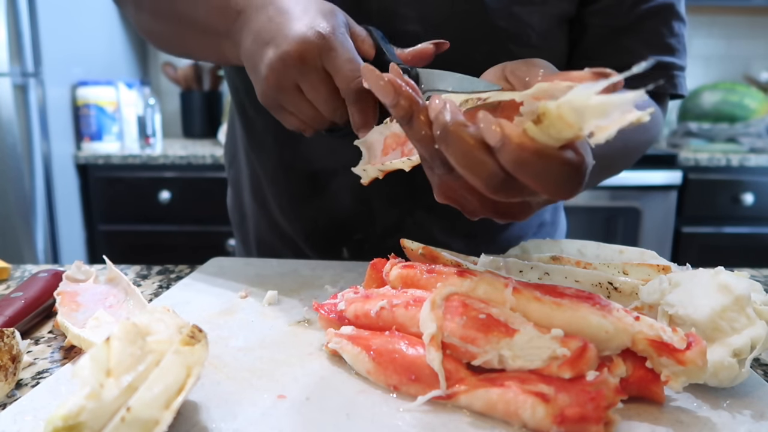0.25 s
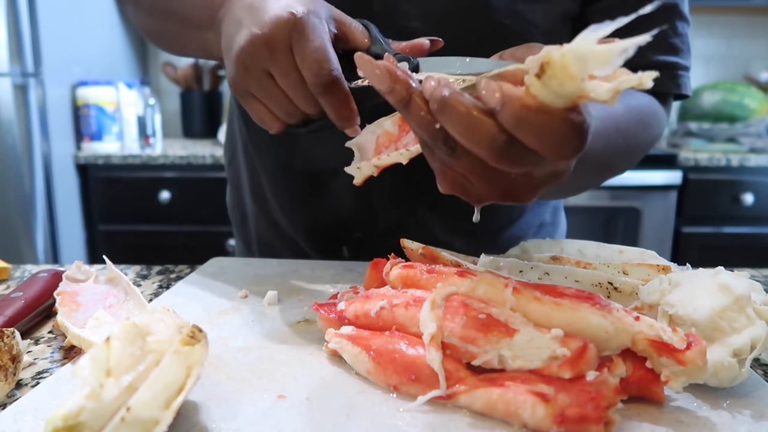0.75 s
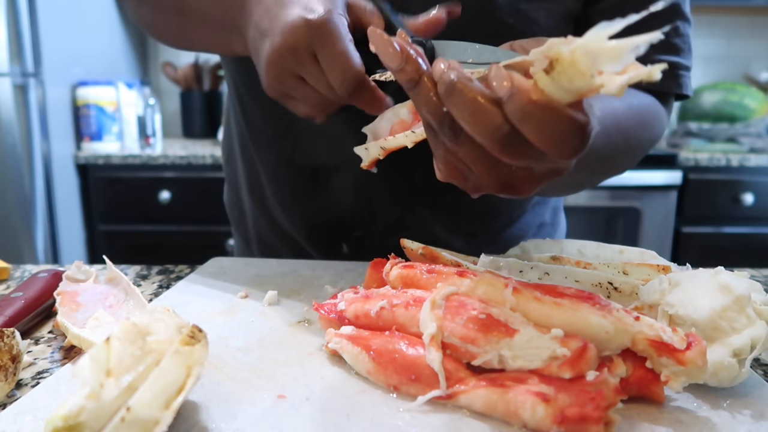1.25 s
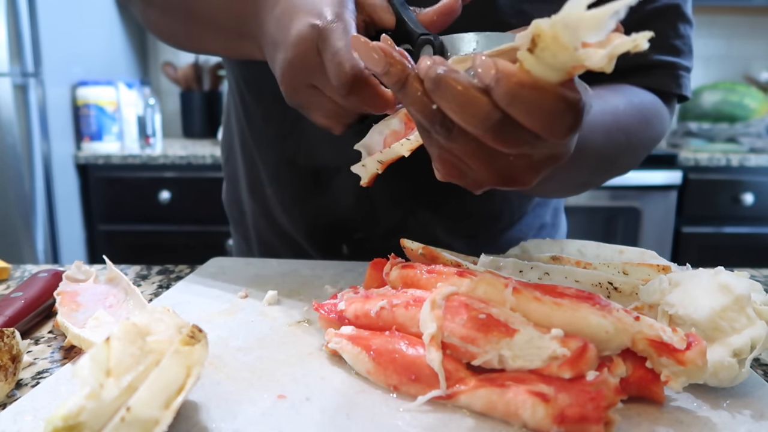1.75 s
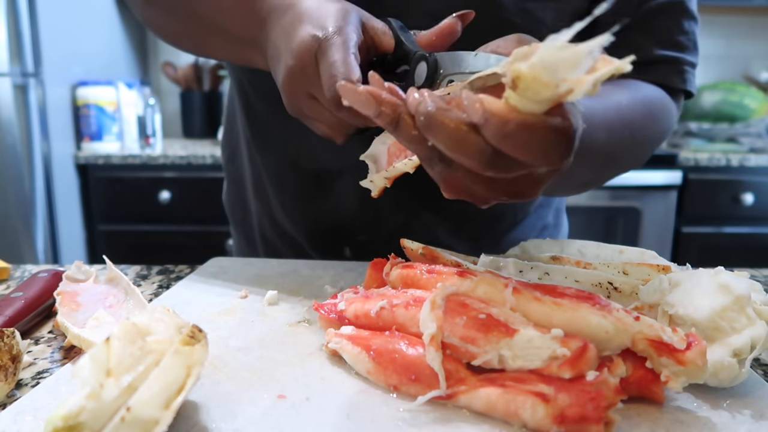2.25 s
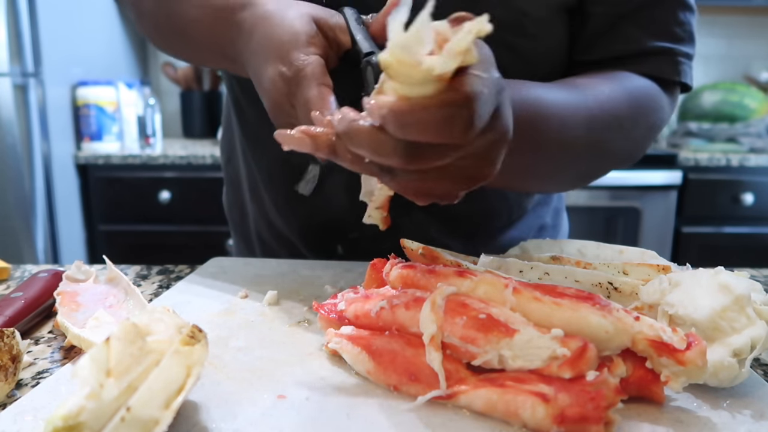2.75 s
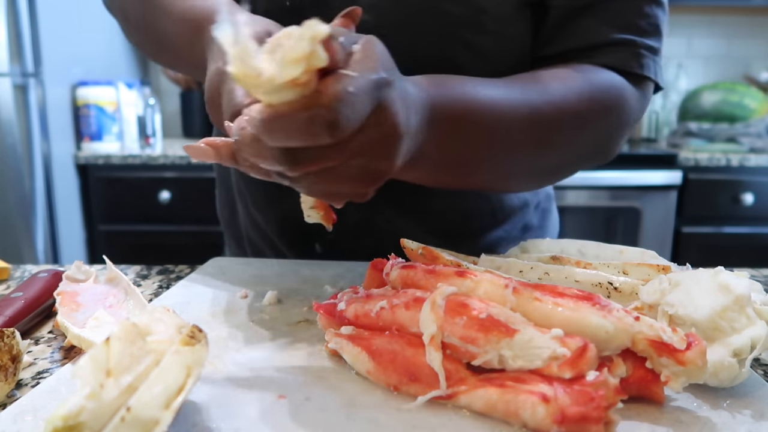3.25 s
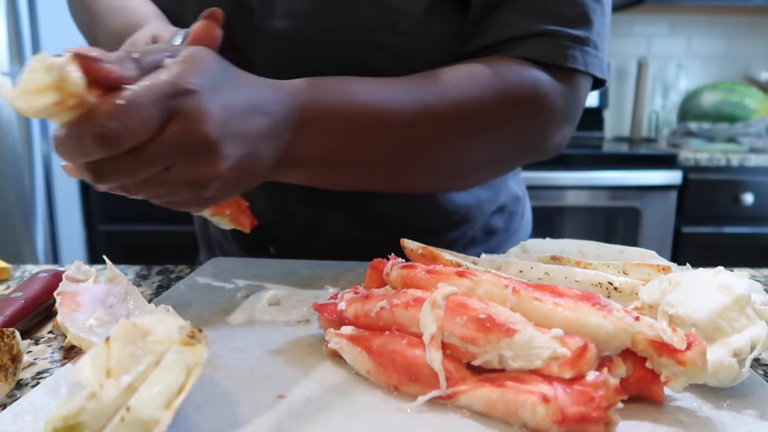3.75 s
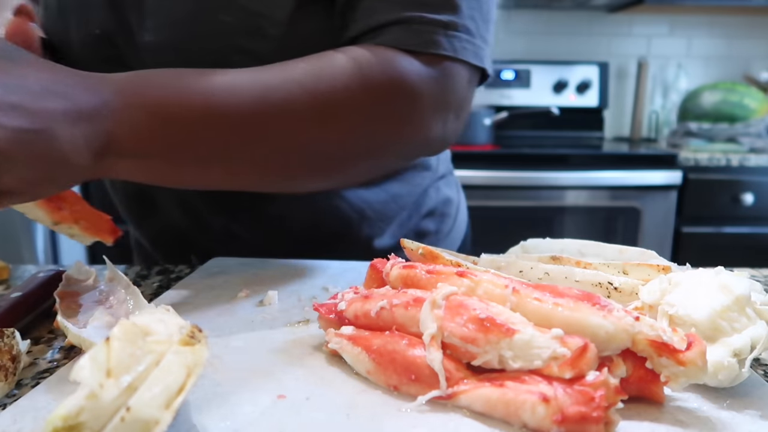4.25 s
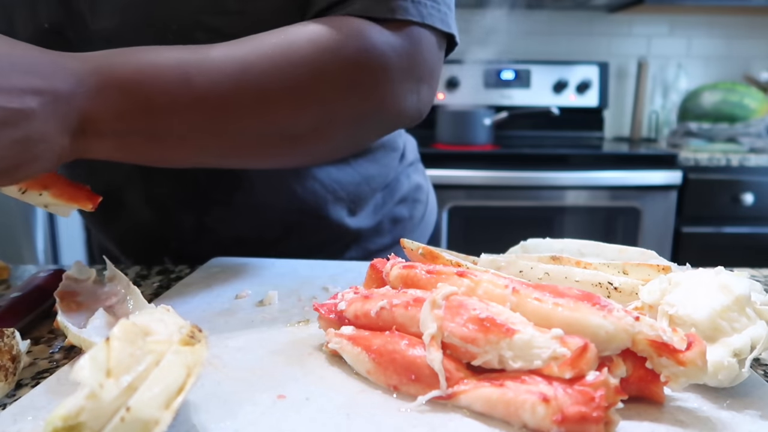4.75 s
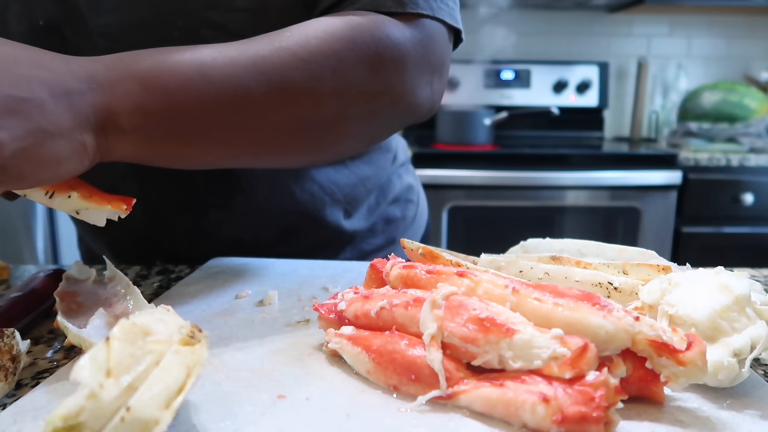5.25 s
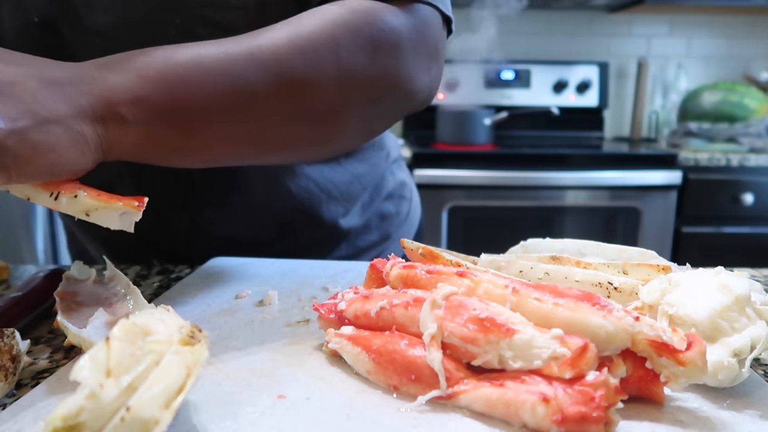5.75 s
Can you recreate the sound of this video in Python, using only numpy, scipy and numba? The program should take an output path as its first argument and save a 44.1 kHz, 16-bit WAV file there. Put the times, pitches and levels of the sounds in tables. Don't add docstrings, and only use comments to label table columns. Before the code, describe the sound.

Close crisp shell snips and crunches in a small kitchen, thinning to faint ticks, ending in a quick ratcheting creak and a crack.

```python
import sys
import numpy as np
from scipy import signal
from scipy.fft import rfft, irfft, next_fast_len
from scipy.io import wavfile
from scipy.ndimage import uniform_filter1d
from numba import njit

SR = 44100
rng = np.random.default_rng(int(sys.argv[2]) if len(sys.argv) > 2 else 0)


def volts(x):
    e = np.asarray(x, float) / 20
    return 10 ** e


def to_wav(s):
    ch = np.atleast_2d(s).T
    pcm = np.round(np.clip(ch, -1, 1) * 32767)
    wavfile.write(sys.argv[1], SR, pcm.astype(np.int16))


N = 264712
SHORT, LONG, TAIL = 2048, 16384, 1500
SEAM_HZ = 5190
LOOSE_DB, FAR_DB = -20, -11


def ring(x, hz, width_hz):
    return signal.lfilter(*signal.iirpeak(hz, hz / width_hz, fs=SR), x)


def chord(x, modes):
    out = 0
    for hz, width_hz, db in modes:
        twice = ring(ring(x, hz, width_hz), hz, width_hz)
        out = out + volts(db) * np.sqrt(300 / width_hz) * twice
    return out


def swell(modes):
    ms = np.arange(SHORT) / SR * 1000
    out = 0
    for hz, rise_ms, db in modes:
        envelope = (ms / rise_ms) ** 2 * np.exp(-ms / rise_ms)
        out = out + volts(db) * envelope * np.sin(2 * np.pi * hz * ms / 1000)
    return out


def colour(x, points, turn=1):
    hz, db = np.transpose(points)
    size = next_fast_len(len(x))
    f_hz = np.maximum(np.arange(size // 2 + 1) * SR / size, 1)
    gain = volts(np.interp(np.log(f_hz), np.log(hz), db))
    return irfft(rfft(x, size) * turn * gain, size)[:len(x)]


def level(x, db):
    return x * volts(db) / np.sqrt(np.mean(x ** 2) + 1e-18)


def walk(rate_hz):
    hold = int(SR / rate_hz)
    steps = np.repeat(rng.standard_normal(N // hold + 1), hold)
    return uniform_filter1d(uniform_filter1d(steps, hold), hold)[:N]


def fractures(size, spread_db):
    return rng.standard_normal(size) * volts(spread_db * rng.exponential(size=size))


def background():
    # f/Hz, density/dB
    fan_tone = [(15, -56), (25, -40), (48, -28), (58, -22), (84, -4.5), (108, -2), (136, -5), (188, -5.5),
                (220, -13.5), (304, -20), (393, -18.5), (443, -27), (487, -22), (549, -31), (620, -34.5),
                (810, -73), (1360, -120)]
    # f/Hz, density/dB
    pot_tone = [(350, 0.5), (600, -12), (756, 2), (1010, -4), (1090, -5), (1490, -4), (1960, -8),
                (2130, -8), (2280, -9.5), (2570, -10.5), (7140, -23), (11300, -25), (15500, -39)]
    fan_waver = volts(walk(1.74))
    pot_waver = volts(0.54 * walk(3.74) + 2.25 * walk(26.85))
    channels = []
    for _ in range(2):
        hum = level(colour(rng.standard_normal(N), fan_tone), -41.5)
        simmer = level(colour(fractures(size=N, spread_db=1.5), pot_tone), -52.5)
        channels.append(fan_waver * hum + pot_waver * simmer)
    return channels


def shell(burst, hz, upper_hz, treble_db, energy, tube_db):
    # f/Hz, width/Hz, level/dB
    shell_modes = [(1090, 720, -9), (1450, 380, -7), (2800, 540, -3), (3406, 460, -6)]
    body = chord(burst, [(hz, 900, 2.5), (hz, 260, tube_db)] + shell_modes)
    crack = chord(burst, [(upper_hz, 1300, -4), (6300, 6500, 4), (10200, 1500, -9), (14000, 4500, -4)])
    sound = body / body.std() + volts(treble_db) * crack / crack.std()
    return sound * np.sqrt(energy / np.sum(sound ** 2))


def scrapes():
    # start/s, end/s, level/dB, ring f/Hz, treble against ring/dB
    drags = [(0.119, 0.134, -33.5, 2640, -14), (.178, 0.2, -23, 2150, -9), (0.443, 0.51, -44, 2160, -8),
             (1.316, 1.367, -52, 2040, -3), (1.534, 1.639, -37.5, 2240, -5.5), (1.95, 1.99, -40, 2150, 13),
             (2.684, 2.778, -47, 2300, -4.5), (3.071, 3.095, -31, 3000, -4),
             (3.311, 3.384, -43.5, 2160, -2.5), (3.637, 3.685, -47, 2560, 5),
             (4.052, 4.095, -47, 2800, -21), (5.058, 5.167, -49, 1470, -27),
             (5.187, 5.229, -44.5, 2800, -7), (5.486, 5.553, -47.5, 3680, -0.5),
             (5.763, 5.845, -30.5, 2880, -6.5), (5.826, 5.839, -27.5, 3000, -2)]
    out = np.zeros(N + SHORT)
    catch = volts(3.8 * walk(90))
    for start_s, end_s, db, hz, treble_db in drags:
        a, size = int(start_s * SR), int((end_s - start_s) * SR)
        burst = fractures(size=LONG, spread_db=1.3)[:size]
        burst = burst * np.hanning(size) ** 0.32 * catch[a:a + size]
        padded = np.pad(burst, (0, TAIL))
        out[a:a + size + TAIL] += volts(db - 4.5) * shell(padded, hz, SEAM_HZ, treble_db, 0.54 * size, FAR_DB)
    return out[:N]


def snaps(rows, upper_hz, tube_db):
    near, walls = np.zeros(N + 2 * SHORT), np.zeros(N + 2 * SHORT)
    t = np.arange(SHORT) / SR
    click = (t == 0).astype(float)
    for middle_s, db, ms, hz, treble_db in rows:
        x = t / (0.32 * ms / 1000)
        burst = fractures(size=SHORT, spread_db=2.5) * x ** 2 * np.exp(-x ** 1.018)
        energy = volts(db + 1.63) ** 2 * ms * SR / 1000
        start = max(int((middle_s - 0.74 * ms / 1000) * SR), 0)
        middle = int(middle_s * SR)
        near[start:start + SHORT] += shell(burst, hz, upper_hz, treble_db, energy, tube_db)
        walls[middle:middle + SHORT] += shell(click, hz, upper_hz, treble_db, energy, tube_db + FAR_DB / 2)
    return np.array([near[:N], walls[:N]])


def cuts():
    # middle/s, level/dB, length/ms, ring f/Hz, treble against ring/dB
    bites = [(.1283, -30.5, 2.9, 2400, -9), (.1516, -37, 2.6, 2260, -9), (.1563, -38.5, 2.5, 2490, -2),
             (.1929, -24, 6.9, 2720, -1.5), (.2463, -49, 4.8, 2430, -9), (.2544, -27, 3.4, 2260, -4.5),
             (.427, -33, 3.3, 1970, -31), (.4341, -45, 8.6, 1980, -28), (.7038, -36.5, 5.6, 2320, -14),
             (.9549, -34.5, 3.5, 2090, -5), (.9842, -31, 2.35, 2130, -5), (1.0275, -38, 8.3, 2010, -6),
             (1.0838, -28, 6.4, 1980, -8), (1.1339, -19.5, 4.1, 1985, -3), (1.3291, -36.5, 3.6, 1940, -14),
             (1.3489, -37.5, 3.7, 2070, -2.5), (1.5954, -46, 16, 2190, -30), (1.7927, -36.5, 2.4, 2160, 4),
             (1.889, -30, 3.7, 2030, -5.5), (1.9421, -23.5, 7.3, 2200, -2.5), (1.973, -34.5, 5.6, 2050, -1),
             (1.9866, -22.5, 6.2, 2150, 2), (2.0118, -16.5, 3.9, 2000, -8), (2.0145, -17, 2.2, 2700, -4)]
    return snaps(bites, upper_hz=5550, tube_db=-5)


def knocks():
    # t/s, peak level/dB, f/Hz
    jolts = [(0.188, -30, 980), (0.253, -58, 921), (1.084, -35, 900), (1.132, -53, 810), (1.89, -29, 920),
             (1.939, -36, 1090), (1.987, -22.5, 1064), (2.01, -50, 1000), (3.084, -23.5, 742),
             (3.367, -36, 1200), (3.85, -39, 883), (4.806, -45, 721), (5.835, -27, 900)]
    out = np.zeros(N + SHORT)
    for s, db, hz in jolts:
        thud = swell([(hz, 1.3, 0), (1.223 * hz, 1.1, -5), (0.821 * hz, 1.6, -8)])
        start = int((s - .0015) * SR)
        out[start:start + SHORT] += volts(db - 3) * thud / np.abs(thud).max()
    return out[:N]


def chips():
    # middle/s, level/dB, ring f/Hz
    ticks = [(.4762, -49.5, 2120), (.4943, -49, 3480), (.7332, -51, 2290), (1.271, -48, 3000),
             (1.2824, -47.5, 3600), (1.3117, -45, 2900), (1.3576, -43, 3800), (1.705, -59, 3000),
             (1.741, -58, 2400), (2.6735, -48.5, 2060), (2.957, -56, 3000), (3.145, -48.5, 3770),
             (3.3299, -44.5, 2320), (3.5229, -56, 2210), (4.24, -50.5, 1870), (4.294, -48.5, 3950),
             (4.399, -55.5, 3320), (4.48, -64, 3000), (4.625, -53.5, 2130), (4.8083, -46.5, 2450),
             (4.881, -49, 2010), (5.1026, -50, 1390), (5.1146, -51, 1370), (5.1865, -50, 3130),
             (5.2082, -44.5, 1450), (5.261, -50, 1380), (5.3358, -52, 2880), (5.401, -47, 1000)]
    length_ms, treble_db, treble_db_per_octave = 5.5, -17.5, 15
    rows = [(s, db, length_ms, hz, treble_db + treble_db_per_octave * np.log2(hz / 2000))
            for s, db, hz in ticks]
    return snaps(rows, upper_hz=5000, tube_db=LOOSE_DB)


def prises():
    # middle/s, level/dB, length/ms, ring f/Hz, treble against ring/dB
    breaks = [(2.7294, -40.5, 4.3, 1510, -30), (2.749, -40.5, 4.4, 2500, -12), (3.086, -23, 3.17, 2350, -5),
              (3.3447, -46, 7.1, 1900, -19), (3.3689, -27, 2.37, 1810, -31), (3.5612, -27, 3.5, 2350, 3),
              (3.6274, -34.5, 4.9, 2250, 4), (3.65, -43.5, 6.9, 2840, 3), (3.6648, -49, 5.1, 2250, 6),
              (3.853, -37.5, 5.2, 1820, -19), (4.0745, -42, 6.3, 3000, -33), (4.561, -46, 4.2, 1220, -16),
              (5.1938, -40.5, 3.8, 3180, -8.5), (5.2782, -37.5, 5.7, 1450, -35),
              (5.2875, -34, 4.5, 2920, -24), (5.3012, -43, 3.3, 2500, -17), (5.563, -40.5, 2.7, 2880, -9),
              (5.8361, -24.5, 7.9, 3230, -3.5), (5.9712, -42, 6.7, 2190, -2)]
    return snaps(breaks, SEAM_HZ, LOOSE_DB)


def creak():
    # t/s, rate/(slips per s)
    slip_rates = [
        (5.5831, 91),
        (5.6007, 209),
        (5.6098, 239),
        (5.66, 76),
        (5.7128, 170),
        (5.756, 190),
    ]
    # t/s, level/dB, lower ring/dB
    effort = [
        (5.583, -16.5, -1),
        (5.6, -20, 0),
        (5.615, -19, -4),
        (5.66, -12, -9.5),
        (5.71, -16, -7.5),
        (5.756, -20.5, -9.5),
    ]
    # f/Hz, rise/ms, level/dB
    low_modes = [(1440, 1.4, -1), (1790, 0.83, 4.5), (1127, 1.2, -8), (760, 0.97, -14.5), (2350, 1.54, -3)]
    # f/Hz, rise/ms, level/dB
    high_modes = [(2920, 0.71, 6.5), (3106, 0.98, 0.5), (3710, 1, -7.5), (4200, 0.8, -11), (5330, 0.27, -9)]
    # f/Hz, width/Hz, level/dB
    grit_modes = [(3000, 1100, 1), (4400, 370, 3), (5600, 1000, -1), (6500, 190, -5.5), (8000, 1300, -3),
                  (10070, 140, -13.5)]
    s, rate = np.transpose(slip_rates)
    at, db, low_db = np.transpose(effort)
    lead_s = .0008
    t = s[0] - lead_s + np.arange(LONG) / SR
    count = (np.cumsum(np.interp(t + lead_s, s, rate, right=0)) / SR).astype(int)
    effort_db = np.interp(t, at, db) + 35 * (t - s[0])
    uneven_db = .8 * rng.standard_normal(LONG)[count]
    slips = np.diff(count, prepend=-1) * volts(uneven_db + effort_db)
    grit_envelope = np.convolve(slips, np.abs(swell([(150, .9, 0)])))[:LONG]
    grit = grit_envelope * rng.standard_normal(LONG)
    low_slips = slips * volts(np.interp(t, at, low_db) + 1.5)
    sound = signal.fftconvolve(slips, swell(high_modes)) + signal.fftconvolve(low_slips, swell(low_modes))
    out, a = np.zeros(N), int(t[0] * SR)
    out[a:a + LONG] = level(sound[:LONG], -23.5) + level(chord(grit, grit_modes), -38)
    return out


def kitchen(x):
    # f/Hz, width/Hz, t60/s, level/dB
    room_bands = [(505, 710, 0.52, -4), (1200, 1300, 0.16, 1), (2400, 4200, 0.33, -16),
                  (2400, 680, 0.6, -12), (4800, 9900, 0.33, -3), (9400, 10000, 0.044, 12.5)]
    room_db, delay_s = -9.5, 0.0017
    t = np.arange(LONG) / SR
    noise = rng.standard_normal(LONG)
    tail = np.zeros(LONG)
    for hz, width_hz, t60_s, db in room_bands:
        tail += volts(db) * ring(noise, hz, width_hz) * np.exp(-np.log(1000) * t / t60_s)
    tail *= np.clip(t / delay_s - 1, 0, 1)
    return signal.fftconvolve(x, volts(room_db) * tail / np.sqrt(np.sum(tail ** 2)))[:N]


def scene():
    # t/s, share to the left
    leg_path = [
        (0, -0.49),
        (3.2, -0.61),
        (3.6, 0.48),
        (4.2, 1.),
        (6, 1.),
    ]
    # f/Hz, level/dB
    capsule = [(20, 0), (6000, 1), (9000, -3.5), (12000, -1.5), (16000, -8)]
    # f/Hz, level/dB
    port_tone = [(60, -22), (110, -21), (200, -20), (380, -19), (700, -38), (1290, -32), (2380, -19.5),
                 (4400, 0.5), (8120, 0.5), (15000, 4)]
    # f/Hz, level/dB
    wide_tone = [(60, -25), (110, -50.5), (200, -20.5), (380, -8), (700, -10.5), (1290, -15.5), (2380, -15),
                 (4400, -2), (8120, 0.5), (15000, 4)]
    around_mid, around_side = background()
    near, walls = cuts() + chips() + prises()
    rest = scrapes() + knocks() + creak()
    left = np.interp(np.arange(N) / SR, *np.transpose(leg_path))
    mid = colour(near + rest + kitchen(walls + rest) + around_mid, capsule)
    ports = colour((near + rest) * left, port_tone, turn=np.exp(1.41j))
    side = ports + colour(kitchen(walls + rest) + around_side, wide_tone)
    return np.array([mid + side, mid - side])


@njit
def follow(x, attack, release):
    e, out = 0., np.empty(len(x))
    for i in range(len(x)):
        e += (x[i] - e) * (attack if x[i] > e else release)
        out[i] = e
    return out


def top_cut(x):
    return signal.sosfilt(signal.butter(12, 15950, fs=SR, output="sos"), x)


def record(dry):
    attack_s, release_s, threshold_db = 0.014, 0.35, -27.5
    loud = follow(np.abs(dry).max(axis=0), 1 / (attack_s * SR), 1 / (release_s * SR))
    gain = np.minimum(1, volts(threshold_db) / (loud + 1e-9)) ** 0.34
    return top_cut(dry * gain)


dry = scene()
out = record(dry)
to_wav(out)
```